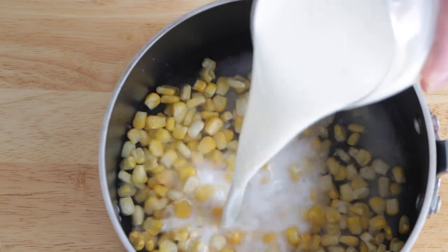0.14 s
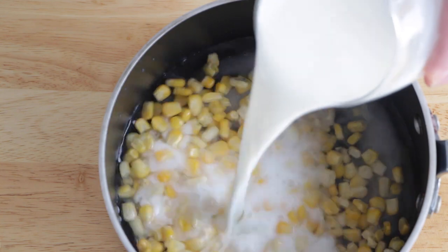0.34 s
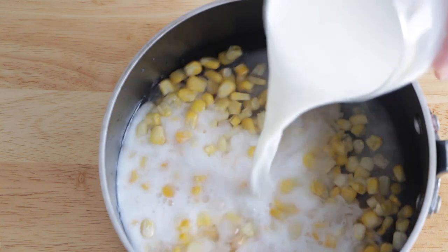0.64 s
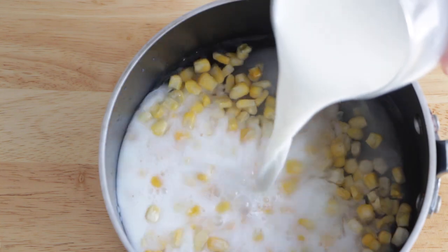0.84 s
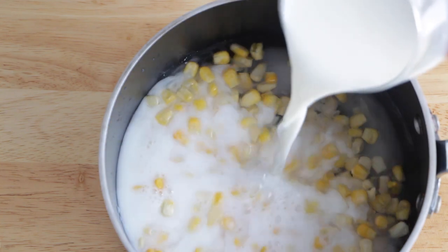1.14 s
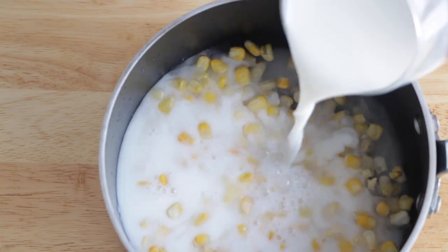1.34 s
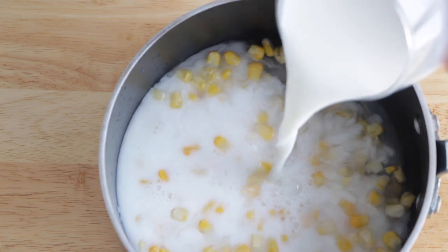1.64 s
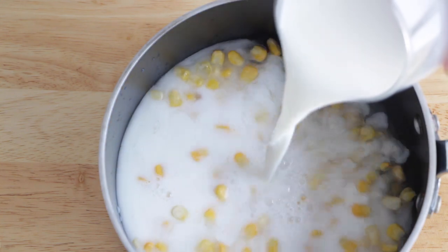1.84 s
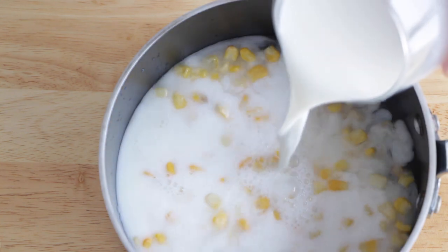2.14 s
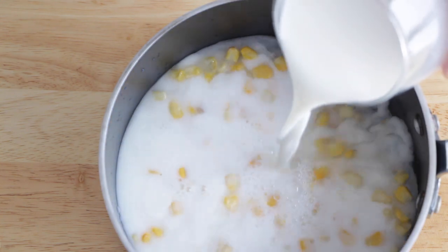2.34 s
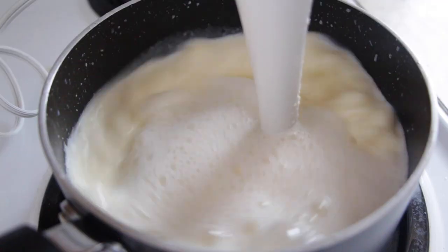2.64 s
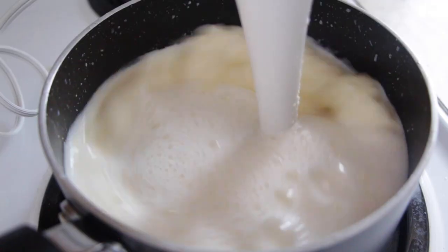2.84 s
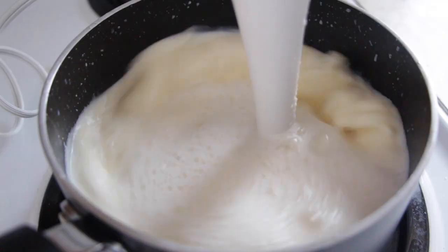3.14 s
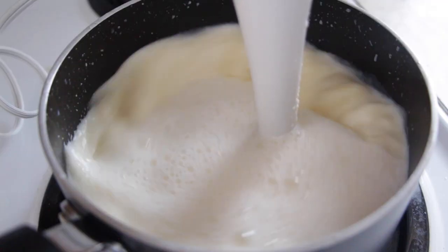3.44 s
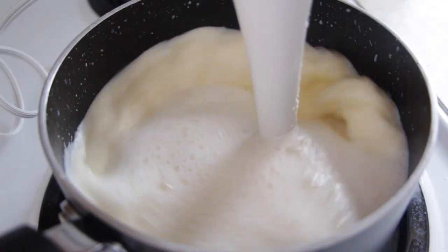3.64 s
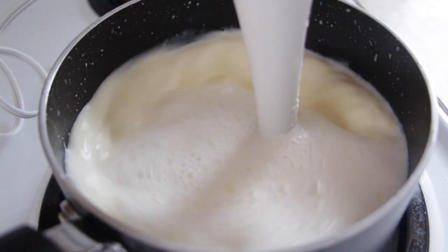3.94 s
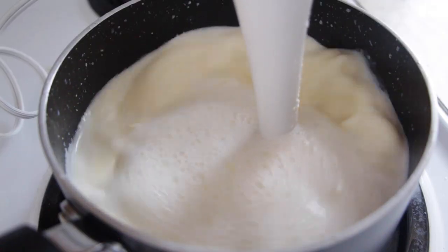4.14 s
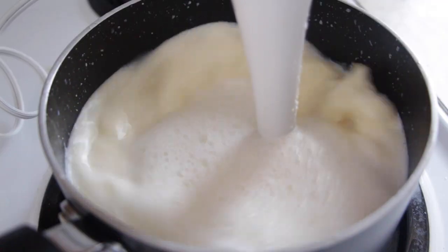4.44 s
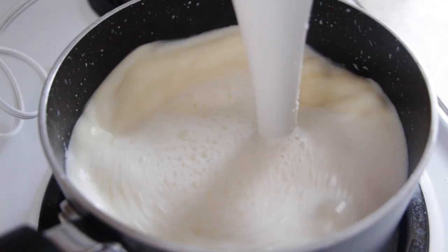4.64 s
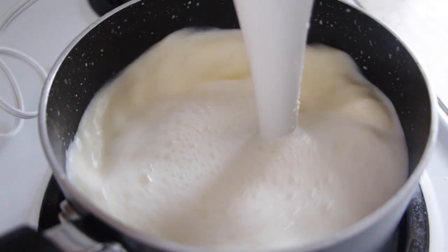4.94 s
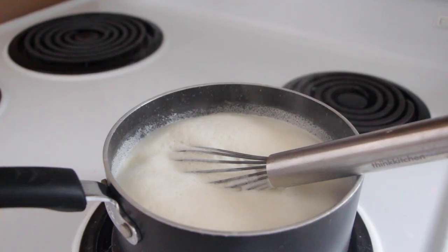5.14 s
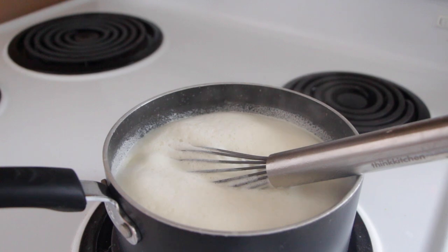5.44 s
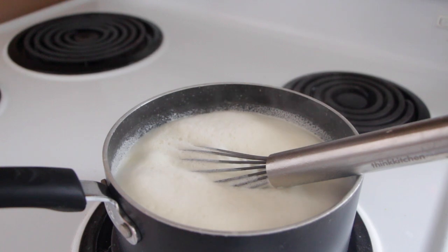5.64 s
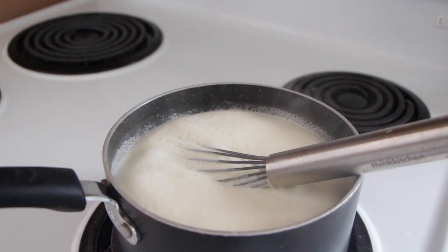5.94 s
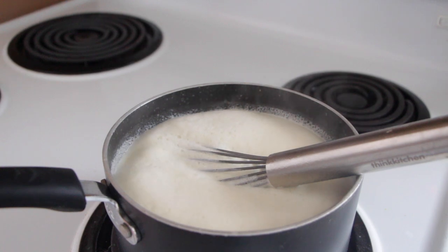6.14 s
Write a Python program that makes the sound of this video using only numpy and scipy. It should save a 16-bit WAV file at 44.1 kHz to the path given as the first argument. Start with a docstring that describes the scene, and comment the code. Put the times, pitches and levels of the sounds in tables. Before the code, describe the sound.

Milk splats, gurgles and patters over corn in a saucepan, then a loud stick blender whines and rattles, then quiet simmering with two whisk clinks.

```python
"""Three moments in a kitchen

Heard close by the stove, one moment straight after the other, the same in both channels. Milk is poured over
corn in a saucepan: damped, rising sines make its splats and bubbles, rough falling tones its glugs. A stick
blender whines in tones locked to its shaft, slowing and rattling when its blade bites the soup. Then the soup
simmers as shaped noise, while a steel whisk clinks twice on the pan in ringing modes."""
import sys
import numpy as np
from scipy import signal
from scipy.fft import rfft, irfft, next_fast_len
from scipy.io import wavfile
from scipy.ndimage import uniform_filter1d, map_coordinates

SR = 44100
rng = np.random.default_rng(int(sys.argv[2]) if len(sys.argv) > 2 else 0)


def int16_out(signal):
    """Quantize to a 16-bit WAV file."""
    q = np.round(np.clip(np.atleast_2d(signal).T, -1, 1) * 32767)
    wavfile.write(sys.argv[1], SR, q.astype(np.int16))


N = 276795
T = np.arange(N) / SR
START_S, STOP_S = 2.574, 5.146  # the blender follows the milk, then gives way to the simmer

# the blade bites into the soup, ever harder until it breaks free:
# [t/s of breaking free, build-up/s, speed loss/Hz before rounding, slap level/dB before flutter]
BITES = [(2.61, .47, 50, -21), (2.842, .135, 5, -24.5), (2.928, .176, 27.5, -18.5), (3.078, .04, 5, -29),
         (3.247, .162, 12, -21), (3.34, .283, 25, -20.5), (3.461, .189, 14, -46), (3.714, .23, 33.5, -18),
         (3.796, .096, 0, -32), (4.117, .227, 29.5, -20), (4.441, .254, 26, -25), (4.52, 0.066, 0, -25),
         (4.68, .195, 20.5, -30.5), (4.99, .33, 20.5, -26)]


def amp(db):
    """Decibels to gain."""
    return 10 ** (np.asarray(db) / 20)


def unit(x):
    """Scale to rms 1."""
    return x / np.sqrt(np.mean(x ** 2) + 1e-20)


def along(points, hz):
    """Read a curve of (f/Hz, value) points on a log frequency axis."""
    f, v = np.transpose(points)
    return np.interp(np.log(hz + 1), np.log(f + 1), v)


def wobble(rate):
    """A smooth random curve, rate knots a second."""
    knots = rng.standard_normal(int(N * rate / SR) + 4)
    coarse_t = T[::32]
    return np.interp(T, coarse_t, map_coordinates(knots, [coarse_t * rate]))


def filtered(x, response):
    """Shape x by a response given as a function of frequency."""
    m = next_fast_len(N + SR // 2)
    return irfft(rfft(x, m) * response(np.fft.rfftfreq(m, 1 / SR)), m)[..., :N]


def noise(spectrum):
    """Noise of rms 1, coloured by (f/Hz, density/dB) points."""
    return unit(filtered(rng.standard_normal(N), lambda hz: amp(along(spectrum, hz))))


def resonate(x, modes):
    """Sound a body of (f/Hz, width/Hz, level/dB) resonances of alternating sign, at rms 1."""
    def body(f):
        response = 0
        for k, (centre, width, db) in enumerate(modes):
            damping = 1j * f * width
            response = response + (-1) ** k * amp(db) * damping / (centre ** 2 - f ** 2 + damping)
        return response
    return unit(filtered(x, body))


def add(track, s, sound):
    """Mix a sound into the track at time s."""
    part = track[max(round(s * SR), 0):][:len(sound)]
    part += sound[:len(part)]


def swells(times, levels_db, rise_s, fade_s, steady_db):
    """Gain of surges that rise to a peak at their times and fade again, over a steady level."""
    age = T - times[:, None]
    shape = np.exp(np.minimum(age / np.reshape(rise_s, (-1, 1)), -age / fade_s))
    surges = amp(levels_db)[:, None] * shape
    return np.sqrt(amp(steady_db) ** 2 + np.sum(surges ** 2, axis=0))


def shaft_speed():
    """Each bite drags the motor down steadily; once the blade is free it speeds up again."""
    free_hz = 303.2  # turns per second with no load
    recover_s, inertia_s = .221, .04  # the motor regains its speed; its mass rounds off each change
    drag = np.zeros(N)
    for s, build, loss_hz, _ in BITES:
        loading = np.clip(1 + (T - s) / build, 0, 1)
        drag += loss_hz * loading * np.exp(-np.maximum(T - s, 0) / recover_s)
    return uniform_filter1d(free_hz - drag, int(inertia_s * SR))


def motor_tones(speed, turns):
    """The unbalanced shaft hums steadily; its higher multiples flutter with the liquid."""
    # motor tones before colouring: [multiple of the shaft speed, level/dB]
    orders = [(1, -23), (2, -25.5), (3, -32.5), (4, -31), (5, -35.5), (6, -32), (7, -36.5), (8, -42),
              (9, -33.5), (10, -46), (11, -38), (12, -45), (14, -41), (15, -41), (16, -47), (17, -50),
              (18, -50), (19, -56), (20, -46), (21, -50), (24, -51), (26, -54), (27, -51), (29, -53),
              (30, -49), (32, -54), (33, -47), (35, -53), (36, -45), (37, -52), (39, -55), (40, -55)]
    # the housing colours the tones, lifting those that pass its treble resonance: [f/Hz, gain/dB]
    housing = [(270, 0), (550, -.7), (850, -2.5), (1350, -3.5), (1620, .5), (2450, 1), (3000, 2),
               (4000, .5), (5400, 2), (8400, 3.5), (9300, 2), (9900, 6.5), (10400, 1.5)]
    tones = np.zeros(N)
    for k, db in orders:
        flutter = min((k - 1) / 3 + 0.28, 1)
        phase = 2 * np.pi * (k * turns + rng.random()) + flutter * .22 * wobble(45)
        level_db = db + along(housing, k * speed) + flutter * 1.8 * wobble(16)
        tones += np.sqrt(2) * amp(level_db) * np.sin(phase)
    return amp(-0.78) * tones


def churning(turns):
    """The rush of blade and brushes is noise that pulses once a turn, muted in the top treble."""
    # colour of the rush before muting: [f/Hz, density/dB per Hz]
    rush_spectrum = [(40, -55), (75, -34), (200, -5.5), (420, -9.5), (850, -4.5), (1600, -4.5), (2200, -6),
                     (3200, -8), (4000, -6), (5100, -15), (7000, -10.5), (8200, -13.5), (10300, -9.5),
                     (15800, -31)]
    rush = filtered(noise(rush_spectrum), lambda hz: amp(-8 * np.clip((hz - 12200) / 200, 0, 1)))
    pulsing = unit(rush * (1 + 0.064 * np.cos(2 * np.pi * turns)))
    return pulsing * amp(-26.5 + 0.41 * wobble(25.31))


def knocks(turns, scatter, scatter_db):
    """One impulse each turn, uneven in time (scatter in s) and strength."""
    at = np.flatnonzero(np.diff(np.floor(turns)) > 0)
    late, size = rng.standard_normal((2, len(at)))
    at = np.clip(at + late * scatter * SR, 0, N - 1).astype(int)
    return np.bincount(at, amp(scatter_db * size), N)


def blade_slaps(turns):
    """Under load each blade tip slaps the soup once a turn, the second more lightly, and the blows ring the
    filled pan."""
    # resonances of the filled pan: [f/Hz, width/Hz, level/dB]
    pan_modes = [(414, 240, -1.5), (843, 300, 2.5), (1300, 740, -0.5), (1785, 520, -3)]
    times, build, _, slap_db = np.transpose(BITES)
    # slaps swell late in the build-up, then die back to a light patter
    slapping = swells(times, slap_db, rise_s=0.34 * build, fade_s=0.041, steady_db=-35)
    slapping = slapping * amp(1.8 * wobble(50))
    meeting = turns + .2 * wobble(14)  # the blade meets the soup at a slowly wandering angle
    tips = knocks(meeting, scatter=.00009, scatter_db=4.0)
    tips = tips + 0.16 * knocks(meeting + .5, scatter=0.00024, scatter_db=7)  # the other tip, lighter
    # a soft blow, without bass or treble
    tips = filtered(tips, lambda hz: (1 - np.exp(-(hz / 640) ** 4)) / (1 + (hz / 2400) ** 4))
    return resonate(tips, pan_modes) * slapping


def shaft_chatter(turns):
    """One uneven knock a turn rings the steel shaft."""
    # resonances of the steel shaft: [f/Hz, width/Hz, level/dB]
    shaft_modes = [(3855, 216, -4), (4425, 170, -10)]
    ringing = resonate(knocks(turns, scatter=0.00018, scatter_db=4.0), shaft_modes)
    return ringing * amp(-31.5 + 2.4 * wobble(22.09))


def blender():
    """Motor tones, churning, blade slaps and shaft chatter, all locked to the turning shaft."""
    speed = shaft_speed() * (1 + .0015 * wobble(55))
    turns = np.cumsum(speed) / SR
    rattle = room(blade_slaps(turns) + shaft_chatter(turns), wet_db=-15)
    return motor_tones(speed, turns) + churning(turns) + rattle


def bubbles(times, hz, size, cycles, rise):
    """Damped sines whose pitch climbs as each bubble nears the surface."""
    t = np.arange(SR // 50) / SR
    age = t * hz[:, None] / cycles
    glide = 1 + rise * (1 - np.exp(-age / 2))
    waves = size[:, None] * np.exp(-age) * np.sin(2 * np.pi * hz[:, None] * t * glide)
    waves = waves * (1 - t / t[-1])
    at = (np.abs(times[:, None]) * SR).astype(int) + np.arange(len(t))
    return np.bincount(at.ravel(), waves.ravel(), N)[:N]


def trickle(count, centre_hz, spread, cycles, scatter_db):
    """A random stream of bubbles of rms 1 for as long as the milk runs."""
    when, size = rng.random((2, count))
    hz = np.minimum(centre_hz * np.exp(spread * rng.standard_normal(count)), SR / 4)
    stream = bubbles(when * START_S, hz, amp(scatter_db * size), cycles, rise=.05)
    return stream / np.std(stream[T < START_S])


def splats(count=16):
    """Each splat traps one main bubble, a burst of smaller ones, and some large hollow ones."""
    # splats of milk on the corn:
    # [t/s, reference level/dB, main bubble f/Hz at its start, hollow level/dB against the reference]
    splat_table = [(0.0794, -23.5, 2590, -29), (0.1015, -22.5, 3140, -33), (0.1338, -26, 2480, -33),
                   (0.1703, -15.5, 3670, -20), (0.1714, -19.5, 2400, -22), (0.3341, -27.5, 3170, -14),
                   (0.382, -26, 4430, -25), (0.407, -33, 3440, -27), (0.4163, -19.5, 6600, -34),
                   (0.471, -36, 3300, -3), (0.5038, -23.5, 6500, -10), (0.6388, -27.5, 2630, -7),
                   (1.003, -50, 2450, 4), (1.2069, -34, 2510, -26), (1.2522, -28.5, 2545, -12),
                   (1.44, -31.5, 4020, -12), (1.46, -34, 2910, -16), (1.5085, -37, 3100, 8.5),
                   (1.544, -32, 2500, -9), (1.5791, -33, 3170, -6), (1.643, -36, 3910, -14),
                   (1.663, -30, 4030, -10), (1.7399, -34.5, 3970, -7), (1.933, -29, 4000, -5),
                   (2.1585, -42, 2510, 5), (2.1923, -32, 2480, -8), (2.2237, -34.5, 2610, -13),
                   (2.4258, -33, 2560, -14)]
    out = np.zeros(N)
    for s, db, hz, hollow_db in splat_table:
        lag, pitch = rng.exponential(1, (2, count)), rng.standard_normal((2, count))
        out += bubbles(np.array([s]), np.array([hz]), amp([db - 3]), cycles=13, rise=.03)
        small_hz = 1.14 * hz * np.exp(.27 * pitch[0])
        small_size = amp(db - 19.0 - 2.3 * lag[0])
        out += bubbles(s + 0.0087 * lag[0], small_hz, small_size, cycles=5.1, rise=0.046)
        hollow_hz = 1300 * np.exp(.3 * pitch[1])
        hollow_size = amp(db + hollow_db - 11.5 - 2 * lag[1])
        out += bubbles(s + .012 * lag[1], hollow_hz, hollow_size, cycles=4.2, rise=.1)
    return out


def ticks():
    """A droplet on the pan wall gives a sharp snap and a short bright ring."""
    # droplets on the wall: [t/s, reference level/dB, ring f/Hz, ring level/dB against the snap]
    drop_table = [(0.0488, -12.5, 11060, -8), (0.07, -19, 10600, -9), (0.1705, -18.5, 6300, -21),
                  (0.334, -28.5, 7060, -1), (0.6517, -36, 8630, 5), (1.1662, -33, 11950, -2),
                  (1.2504, -26, 10900, -0.5), (1.932, -34, 8950, -15), (2.426, -19, 7480, 0)]
    out, t = np.zeros(N), np.arange(SR // 20) / SR
    f = np.fft.rfftfreq(len(t), 1 / SR)
    for s, db, hz, ring_db in drop_table:
        octaves = np.log2((f + 1) / hz)
        band = amp(np.minimum(70 * octaves, -9 * octaves))  # little lies below the ring
        snap = unit(irfft(rfft(rng.standard_normal(len(t))) * band, len(t)))
        snap = snap * amp(-60 * t / 0.012)
        ring = np.sin(2 * np.pi * hz * t) + 0.39 * np.sin(2 * np.pi * 0.83 * hz * t)
        ring = ring * amp(-60 * t / 0.017)
        touch = 1 - np.exp(-t / .00015)
        add(out, s, amp(db - 5) * touch * (snap + amp(ring_db) * ring))
    # muted in the top treble
    return filtered(out, lambda hz: amp(-11 * np.clip((hz - 11200) / 2000, 0, 1)))


def glugs():
    """A pocket of air sings with a rough, falling pitch as it opens."""
    # air gulped under the milk: [t/s, level/dB before shaping, first f/Hz, last f/Hz, length/s]
    pockets = [(0.174, -38, 725, 650, 0.049), (0.638, -30, 730, 588, 0.07), (0.69, -40.5, 600, 388, 0.079),
               (1.546, -44, 586, 363, 0.058)]
    out = np.zeros(N)
    for s, db, first_hz, last_hz, length in pockets:
        u = np.linspace(0, 1, int(length * SR))
        pitch = first_hz * (last_hz / first_hz) ** u
        phase = 2 * np.pi * np.cumsum(pitch) / SR + 0.45 * wobble(170)[:len(u)]
        add(out, s, amp(db) * np.sin(phase) * (1 - np.exp(-u / 0.14)) * (1 - u))
    return out * amp(2.8 * wobble(150))


def stream():
    """The milk arrives in gushes, gurgling in low bubbles and spraying fine drops."""
    # gushes of milk: [t/s, gurgle level/dB and spray level/dB, both before the mix gains]
    gushes = [(0.109, -59, -31), (0.19, -44.5, -35.5), (0.315, -56, -50), (0.405, -64, -37.5),
              (0.465, -51, -41.5), (0.515, -45, -46), (0.59, -52, -58), (0.65, -53, -51),
              (1.015, -44.5, -52), (1.075, -49, -70), (1.26, -44.5, -63), (1.46, -49, -47),
              (1.515, -41, -44), (1.6, -47, -50), (1.68, -43.5, -44.5), (1.76, -51, -49),
              (1.945, -48.5, -67), (2.19, -45, -53), (2.42, -44, -49.5), (2.496, -53, -62)]
    # patter of fine drops on the kernels: [f/Hz, density/dB per Hz]
    patter_spectrum = [(1200, -25), (1950, -22), (2500, 3.5), (3600, -6), (4700, 2), (5600, -3), (6500, 2),
                       (8500, -6.5), (11500, -8.5), (13000, -24)]
    times, gurgle_db, spray_db = np.transpose(gushes)
    # the steady levels are the thin stream between gushes
    gurgling = swells(times, gurgle_db, rise_s=0.02, fade_s=0.067, steady_db=-61)
    spraying = swells(times, spray_db, rise_s=0.02, fade_s=0.045, steady_db=-67)
    low_bubbles = trickle(count=900, centre_hz=1245, spread=0.328, cycles=7, scatter_db=30)
    droplets = trickle(count=1500, centre_hz=3900, spread=.36, cycles=10, scatter_db=30)
    # the patter fades as the rising milk covers the kernels
    patter = unit(noise(patter_spectrum) * amp(5 * wobble(500))) * amp(-10 * T)
    spray = spraying * (amp(-6.0) * droplets + amp(-4.0) * patter)
    return gurgling * amp(-4.5) * low_bubbles + spray


def pan_boom():
    """The pan booms on the worktop as the first milk lands: a wavering low tone and a thud."""
    # booms: [t/s, level/dB of the tone, half length/s to 1/e]
    booms = [(0.139, -30, .03), (0.243, -26, .06)]
    thud = noise([(25, 5), (70, 3), (200, -47)])
    booming = sum(amp(db) * np.exp(-((T - s) / half) ** 2) for s, db, half in booms)
    return booming * (np.sin(2 * np.pi * 83 * T + .2 * wobble(15)) + amp(-15) * thud)


def milk():
    """The stream gurgles, sprays and patters in the pan, over the hum of the kitchen."""
    wet_milk = room(stream() + splats() + glugs(), wet_db=-5.5)
    return wet_milk + room(ticks(), wet_db=-3.0) + pan_boom() + appliance_hum() + kitchen_air()


def whisk():
    """The wires skid over the pan and ring the steel, which the soup damps."""
    # whisk against the pan: [t/s, level/dB, scrape length/s, brightness/dB per octave]
    clinks = [(5.333, -28, 0.019, -5), (5.775, -41, 0.011, 12)]
    # ringing steel: [f/Hz, level/dB before brightness, t60/s before the soup's damping]
    steel_modes = [(1926, -16, 0.16), (2800, -13, 0.14), (3500, 4, 0.058), (4200, -4, 0.19),
                   (4550, -17, 0.33), (4620, -15, 0.19), (5300, -1, 0.2), (5450, 2, 0.14),
                   (6169, -11, 0.33), (6400, -12, 0.14), (7060, -22, 0.3), (7300, -3, 0.11),
                   (7830, 3, 0.17), (8900, -7, 0.22), (9275, -12, 0.23), (9200, -12, 0.12),
                   (11270, -30, 0.64), (11720, -28, 0.23)]
    skid_spectrum = [(800, -19), (1500, -8.0), (2500, -14.0), (5400, -1.5),
                     (6200, -3.5), (7800, -2.0), (11500, -5.5), (13000, -22)]
    out, t = np.zeros(N), np.arange(SR // 2) / SR
    for s, db, length, bright_db in clinks:
        ring = np.zeros(len(t))
        for hz, level, t60 in steel_modes:
            decay = amp(level + bright_db * np.log2(hz / 6000) - 60 * t / t60)
            ring += decay * np.sin(2 * np.pi * (hz * t + rng.random()))
        ring = ring / np.std(ring[:SR // 50])
        ring = ring * (1 - np.exp(-t / .004)) * amp(-60 * t / .25)  # damped by the soup
        skid = noise(skid_spectrum)[:len(t)]
        contact = (1 - np.exp(-t / 0.0021)) * amp(-60 * np.maximum(t - length, 0) / 0.036)
        add(out, s, amp(db) * ring + amp(db + 0.5) * skid * contact)
    return room(out, wet_db=-4.0)


def simmer():
    """Steam bubbles mutter unevenly on the bottom of the pan under a faint fizz of foam."""
    # colour of the simmer: [f/Hz, density/dB per Hz]
    simmer_spectrum = [(25, -25), (105, -0.5), (150, -16.5), (235, 6), (280, -11), (345, 2.5), (520, -12.5),
                       (1200, -21), (3500, -28), (5800, -30.5), (8500, -31.5), (10500, -25), (13000, -34),
                       (15500, -35)]
    mutter = noise(simmer_spectrum)
    low = filtered(mutter, lambda hz: 1 / (1 + (hz / 700) ** 4))
    return amp(-44.0) * (mutter + low * (amp(1.0 * wobble(22)) - 1))  # only the low part wavers


def appliance_hum():
    """Kitchen appliances hum in steady pitches that waver a little in level and phase."""
    # hum tones: [f/Hz, level/dB before a common lift]
    hum_tones = [(81, -53), (119.5, -54), (263.8, -62), (360.7, -66), (538.3, -64), (678.3, -79)]
    out = np.zeros(N)
    for hz, db in hum_tones:
        level = amp(db + 2.5 + 1.6 * wobble(5.54))
        out += level * np.sin(2 * np.pi * hz * T + .5 * wobble(5.22))
    return out


def kitchen_air():
    """The air of the room behind the milk is steady noise, weighted to the bass."""
    # colour of the air: [f/Hz, density/dB per Hz]
    air_spectrum = [(25, 1), (55, 0.5), (82, 5), (160, -5.5), (400, -6), (1000, -10.5), (1700, -19.5),
                    (3000, -20), (5500, -25.5), (15500, -27)]
    return amp(-53.5) * noise(air_spectrum)


def rumble():
    """A low rumble under the blender, noise gathered around 85 Hz."""
    return amp(-55.5) * noise([(25, -28), (50, -11), (85, 17), (130, -30), (300, -16), (1000, -60)])


def room(x, wet_db):
    """A small hard kitchen answers the sound with a decaying noise tail."""
    # decay of the kitchen: [f/Hz, t60/s]
    decay_times = [(200, 0.31), (1300, 0.3), (4000, 0.23), (11000, 0.23), (14000, 0.18)]
    hz, t, z = signal.stft(rng.standard_normal(SR // 2), SR, nperseg=256)
    decay = amp(-60 * t / along(decay_times, hz)[:, None])
    tail = signal.istft(z * decay, SR, nperseg=256)[1]
    tail = np.pad(tail / np.linalg.norm(tail), (SR // 300, 0))  # the answer comes about 3 ms late
    return x + amp(wet_db) * signal.fftconvolve(x, tail)[:N]


def scene():
    """Pouring, blending and simmering follow each other abruptly, all in the centre."""
    pouring = uniform_filter1d(1. * (T < START_S), SR // 1000)
    simmering = uniform_filter1d(1. * (T > STOP_S), SR // 1000)
    blending = 1 - pouring - simmering
    mono = pouring * milk() + blending * (blender() + rumble()) + simmering * (simmer() + whisk())
    return np.array([mono, mono])


def record(dry):
    """The recorder keeps nothing above its band limit of 15.8 kHz."""
    return filtered(dry, lambda hz: hz < 15800)


dry = scene()
out = record(dry)
int16_out(out)
```